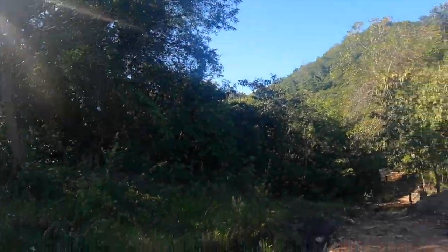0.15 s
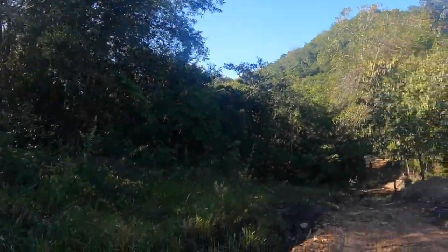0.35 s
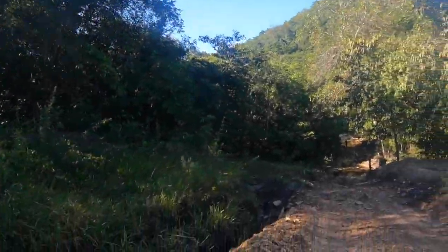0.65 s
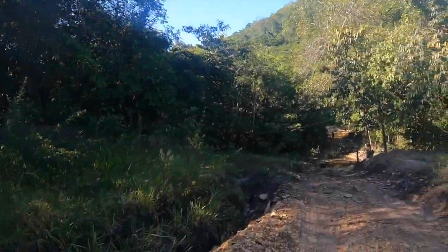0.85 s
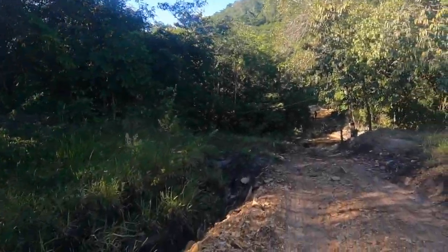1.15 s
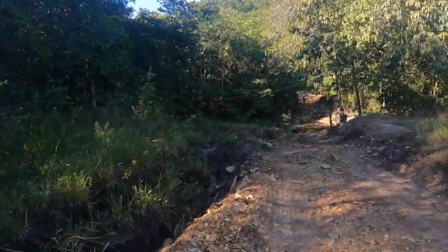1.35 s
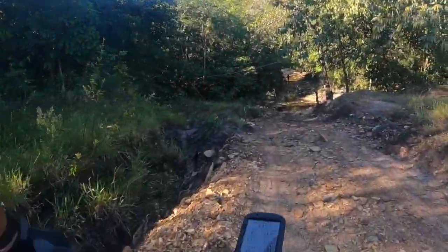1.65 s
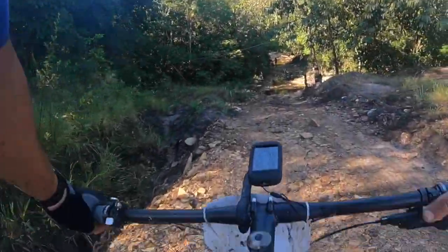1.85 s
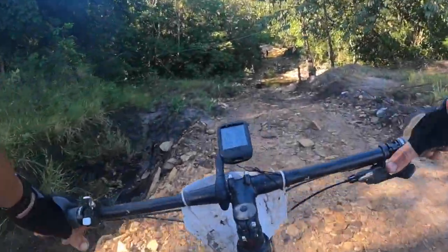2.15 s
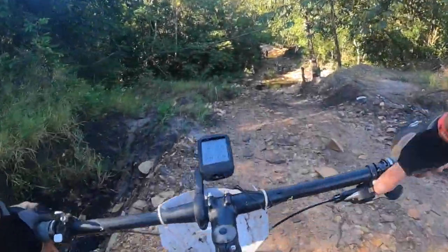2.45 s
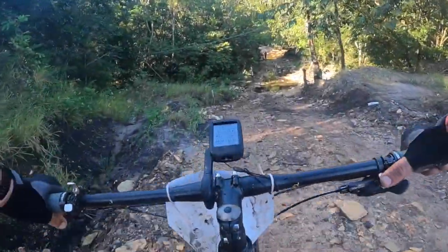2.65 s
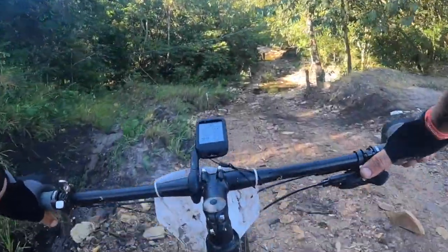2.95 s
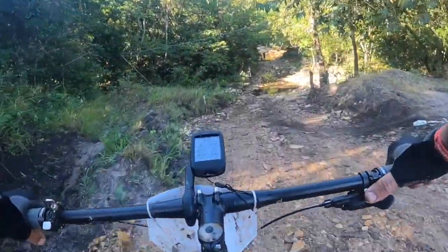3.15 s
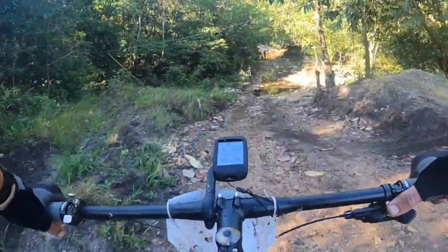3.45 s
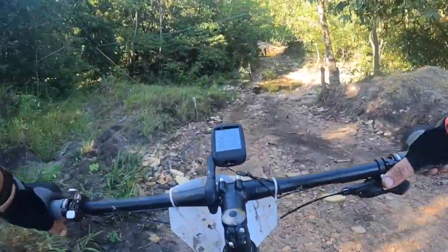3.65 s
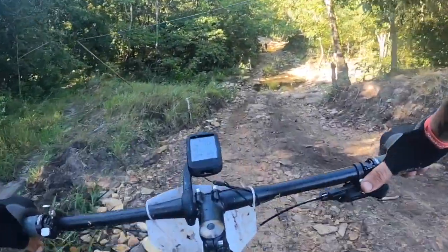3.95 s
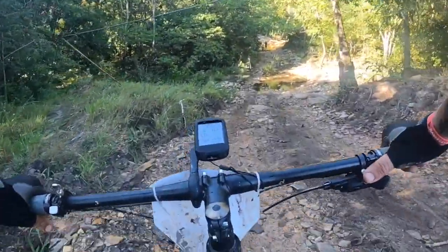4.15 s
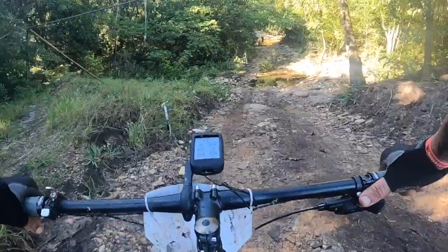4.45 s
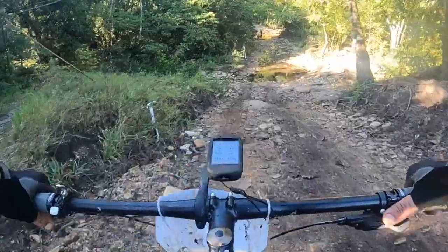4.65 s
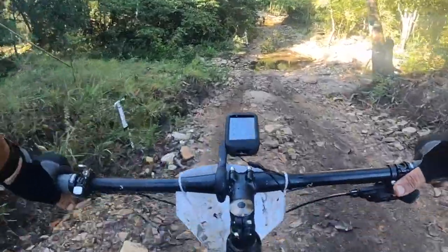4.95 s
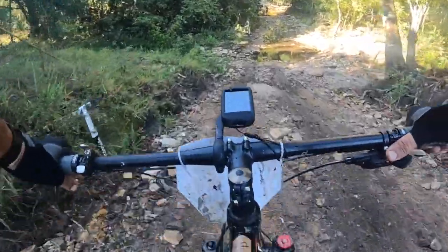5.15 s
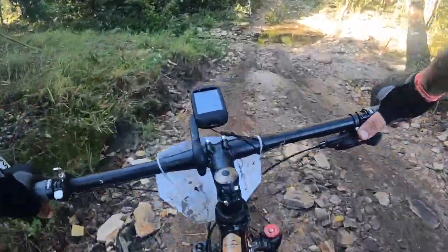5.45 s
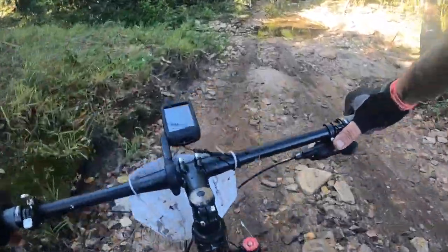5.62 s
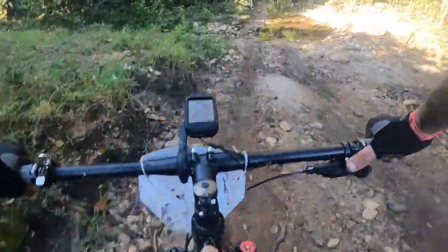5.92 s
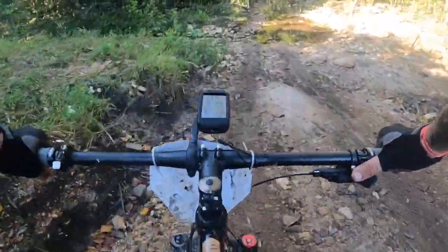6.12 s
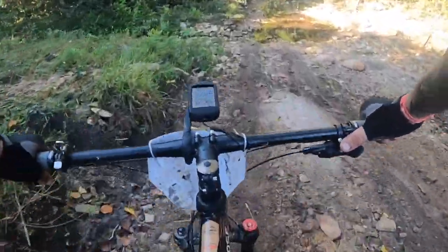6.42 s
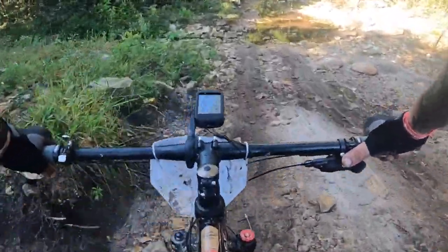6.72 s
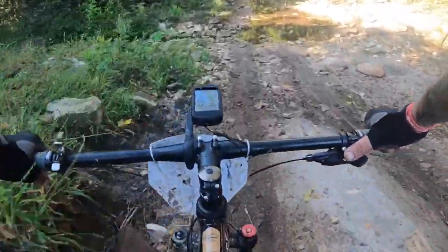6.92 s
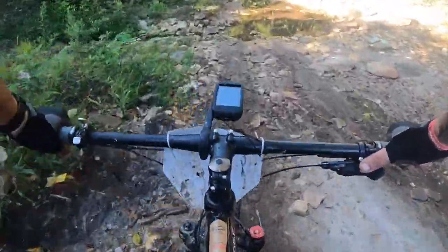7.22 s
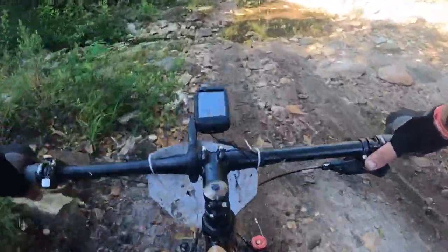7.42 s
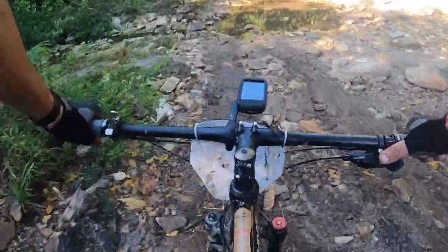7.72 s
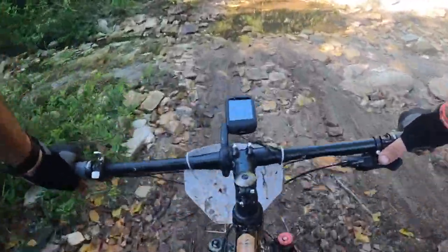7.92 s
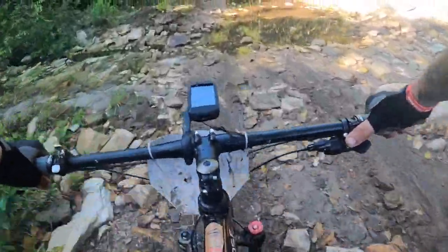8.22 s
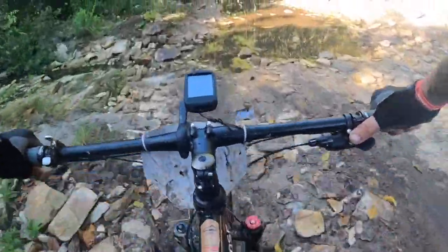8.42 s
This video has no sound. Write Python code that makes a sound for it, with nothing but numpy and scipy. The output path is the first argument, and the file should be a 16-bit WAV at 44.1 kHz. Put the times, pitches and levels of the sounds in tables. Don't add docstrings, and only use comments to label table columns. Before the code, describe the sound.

Close on a rider's chest, bike tyres crunch softly over loose grit, with pebble taps and thin bright hub clicks. After about three seconds a disc brake begins to squeal in short, unsteady grips, around a mid-high fixed pitch, growing loud and almost continuous. Stones thump tyre and frame beneath it, with low wind rumble, outdoors on a dry rocky trail.

```python
import sys
import numpy as np
from scipy import signal
from scipy.fft import rfft, irfft, next_fast_len
from scipy.io import wavfile
from scipy.ndimage import uniform_filter1d, minimum_filter1d, map_coordinates

SR = 44100
rng = np.random.default_rng(int(sys.argv[2]) if len(sys.argv) > 2 else 0)


def nominal_scale(level):
    x = np.asarray(level, float) / 20
    return 10 ** x


def wrap_up_sound(samples):
    columns = np.atleast_2d(samples).T
    tamed = np.clip(columns, -1, 1)
    steps = np.round(tamed * 32767).astype(np.int16)
    wavfile.write(sys.argv[1], SR, steps)


N = 378378

# [multiple of the fundamental, level/dB]
OVERTONES = [(1, 0), (2, -5), (3, -19), (4, -27), (5, -28), (6, -43), (7, -42), (8, -46), (9, -42),
             (10, -56.5), (11, -53.5), (12, -63), (13, -70.5), (14, -60), (15, -73.5)]
# [t/s, f/Hz]
ROTOR_PITCH = [(3.25, 866), (3.45, 874), (3.55, 856), (3.75, 862), (3.85, 872), (3.95, 860), (4.05, 872),
               (4.15, 890), (4.3, 868), (4.55, 858), (4.9, 858), (5.5, 862), (6.4, 856), (6.55, 861),
               (7.1, 860), (7.35, 854), (7.6, 860), (8.1, 856)]
STEADINESS = [2.8, 2.0, .8, .5]
FUNDAMENTAL_SLIPS = [3.328, 3.385, 3.459, 3.486, 4.167, 4.619, 4.68, 4.706, 4.825, 4.853, 4.928, 4.97,
                     5.085, 5.122, 5.275, 5.295, 5.36, 5.48, 5.517, 5.587, 5.741, 5.844, 5.874, 5.944,
                     6.228, 6.327, 6.43, 6.508, 6.596, 6.631, 6.678, 6.802, 6.846, 6.997, 7.123, 7.187,
                     7.228, 7.269, 7.318, 7.357, 7.464, 7.502, 7.659, 7.767, 7.851, 8.024, 8.081, 8.49]
OCTAVE_SLIPS = [3.924, 4.063, 4.945, 4.971, 5.16, 5.311, 5.346, 5.492, 5.542, 5.578, 5.625, 5.664, 5.689,
                5.723, 5.837, 5.859, 6.261, 6.439, 6.471, 6.519, 6.654, 6.736, 6.777, 6.828, 6.872, 6.925,
                6.95, 7.018, 7.042, 7.118, 7.161, 7.257, 7.333, 7.573, 7.617, 7.699, 7.764, 7.806, 7.849,
                8.033]
# [f/Hz, level/dB]
HISS_COLOUR = [(1760, -18), (3000, -12.5), (3860, 0), (4830, -3.5), (5440, -5), (8700, -8.5), (9660, -15.5),
               (10700, -23), (12300, -20.5), (14900, -37), (16000, -46)]


def brake():
    out = np.zeros((2, N))
    first_db, octave_db, third_db, upper_db = grips()
    lock = np.clip((np.maximum(first_db, octave_db) + 38) / 18, 0, 1)
    drag = nominal_scale((1 - lock) * 2 * wobble(35))
    wander = wobble(40)
    jitter_hz = 3 + 30 * (1 - lock) ** 2
    rest_hz = 862.5
    pitch = curves([(0, rest_hz)] + ROTOR_PITCH)[0] + 6 * wander + jitter_hz * wobble(220)
    phase = 2 * np.pi * np.cumsum(pitch) / SR
    for k, db in OVERTONES:
        group = min(k, 4) - 1
        level_db = [first_db, octave_db, third_db, upper_db + db + 19][group]
        steady = lock * STEADINESS[group]
        sign = slipping([FUNDAMENTAL_SLIPS, OCTAVE_SLIPS][k - 1]) if k < 3 else 1
        beat = beating(width_hz=44 * k ** .45, fastest_hz=110 * k ** .3)
        bend_hz = 6 * (k - 1) ** .5 * np.roll(wander, k * SR)
        stray = 2 * np.pi * np.cumsum(bend_hz) / SR
        locked = sign * steady * np.array([[1], [-.8]])
        loose = beat - np.array([[0], [.8]]) * beat[0]
        flutter = (locked + loose) / np.sqrt(1 + steady ** 2)
        tone = np.imag(flutter * np.exp(1j * (k * phase + stray)))
        out += np.sqrt(2) * nominal_scale(level_db) * drag * tone
    rasp = nominal_scale(upper_db - 25) * grainy(HISS_COLOUR, grain_db=3.0, grain_rate=720, lump_db=3.0)
    return out + rasp


# [top t/s, half length/s, level/dB]
LIGHT_TOUCHES = [
    (0.07, 0.071, -43),
    (.2, 0.16, -51),
    (0.385, 0.083, -40),
    (.46, .04, -46),
]
# [top t/s, half length/s, level/dB]
GRIPS = [(3.27, 0.13, -35), (3.408, 0.0743, -22), (3.506, 0.067, -22.5), (3.677, 0.148, -35),
         (3.816, 0.0744, -29), (3.913, 0.034, -26), (4.032, 0.12, -26.5), (4.156, 0.096, -34),
         (4.28, 0.1, -33), (4.4, 0.0779, -36), (4.51, 0.1032, -33.5), (4.616, 0.1, -26),
         (4.678, 0.046, -32.5), (4.759, 0.0747, -21.5), (4.892, 0.1, -18.5), (5, 0.06, -17),
         (5.094, 0.1, -31.5), (5.193, 0.12, -23), (5.302, 0.066, -21), (5.385, 0.051, -35),
         (5.434, 0.088, -16.5), (5.488, 0.061, -31), (5.556, 0.068, -19), (5.618, 0.018, -30),
         (5.667, 0.094, -16.5), (5.751, 0.097, -28), (5.849, 0.075, -18.5), (5.929, 0.075, -29.5),
         (6.045, 0.1, -31), (6.176, 0.0754, -31), (6.255, 0.0795, -16), (6.346, 0.059, -27.5),
         (6.429, 0.089, -21.5), (6.473, 0.077, -30), (6.553, 0.069, -17.5), (6.66, 0.12, -20.5),
         (6.746, 0.08, -16.5), (6.839, 0.082, -17), (6.943, 0.084, -18.5), (7.027, 0.088, -25.5),
         (7.13, 0.087, -20.5), (7.199, 0.06, -27.5), (7.268, 0.067, -16.5), (7.373, 0.11, -28),
         (7.473, 0.094, -25), (7.518, 0.04, -28.5), (7.583, 0.066, -22), (7.633, 0.067, -26.5),
         (7.709, 0.073, -19), (7.81, 0.076, -17.5), (7.882, 0.082, -31), (7.938, 0.089, -19),
         (8.014, 0.13, -31.5), (8.14, 0.1, -34), (8.296, 0.13, -28), (8.418, 0.053, -32.5),
         (8.481, 0.075, -26.5), (8.539, 0.07, -31)]
# [top t/s, half length/s, level/dB]
OCTAVE_SWELLS = [(3.193, 0.078, -42.5), (3.312, 0.1, -35), (3.442, 0.11, -35), (3.562, 0.0503, -22.5),
                 (3.637, 0.046, -32), (3.722, 0.064, -32), (3.826, 0.075, -37), (3.881, 0.09, -34.5),
                 (3.951, 0.065, -33), (4.041, 0.069, -28), (4.136, 0.072, -32.5), (4.235, 0.058, -34),
                 (4.62, 0.19, -37.5), (4.769, 0.091, -34.5), (4.889, 0.086, -39.5), (4.959, 0.073, -19),
                 (5.044, 0.091, -36), (5.158, 0.079, -27.0), (5.293, 0.065, -27.5), (5.398, 0.2, -35.5),
                 (5.468, 0.057, -27), (5.527, 0.018, -15.5), (5.592, 0.067, -18), (5.677, 0.067, -24.5),
                 (5.767, 0.089, -20.5), (5.872, 0.072, -27.5), (5.941, 0.062, -38), (6.186, 0.05, -35.5),
                 (6.266, 0.069, -17.5), (6.366, 0.047, -30), (6.44, 0.065, -18.5), (6.52, 0.072, -28.5),
                 (6.595, 0.066, -21.5), (6.66, 0.032, -32), (6.72, 0.089, -23.5), (6.795, 0.04, -27.5),
                 (6.864, 0.072, -19), (6.964, 0.086, -23), (7.069, 0.078, -21.5), (7.129, 0.036, -32),
                 (7.179, 0.056, -20.5), (7.214, 0.015, -27), (7.29, 0.092, -23.5), (7.43, 0.089, -36),
                 (7.538, 0.072, -25), (7.603, 0.051, -32.5), (7.658, 0.079, -20.5), (7.722, 0.058, -31.5),
                 (7.777, 0.091, -22.5), (7.852, 0.097, -24.5), (7.967, 0.057, -20.5), (8.072, 0.078, -30.5),
                 (8.246, 0.077, -33.5), (8.361, 0.11, -43.5), (8.466, 0.063, -38), (8.551, 0.04, -36.5)]
# [top t/s, half length/s, level/dB]
TWELFTH_SWELLS = [(3.293, 0.15, -52), (3.572, 0.11, -51), (3.732, 0.087, -46), (3.871, 0.0505, -59),
                  (4.006, 0.038, -39.5), (4.096, 0.091, -44), (4.235, 0.068, -45.5), (4.55, 0.36, -52),
                  (4.944, 0.079, -36.5), (5.029, 0.15, -49.5), (5.168, 0.062, -51.5), (5.283, 0.15, -42.5),
                  (5.448, 0.063, -35), (5.572, 0.1, -31), (5.692, 0.093, -32.5), (5.802, 0.073, -34.5),
                  (5.892, 0.06, -46.5), (6.236, 0.062, -33.5), (6.301, 0.13, -49.5), (6.41, 0.052, -39.5),
                  (6.52, 0.11, -36.5), (6.635, 0.073, -34), (6.705, 0.049, -40), (6.765, 0.052, -37),
                  (6.854, 0.077, -31.5), (6.954, 0.061, -31.5), (7.064, 0.075, -40.5),
                  (7.169, 0.064, -32.5), (7.288, 0.092, -42.5), (7.448, 0.049, -45.5),
                  (7.543, 0.081, -34.5), (7.633, 0.067, -29.5), (7.722, 0.098, -36.5),
                  (7.822, 0.093, -37.5), (7.937, 0.11, -37.5), (8.171, 0.49, -52)]


def grips():
    third_db = swells(TWELFTH_SWELLS)
    upper_db = -33.5 + (third_db + 33.5) - 0.15 * bumps()
    return swells(LIGHT_TOUCHES + GRIPS), swells(OCTAVE_SWELLS), third_db, upper_db


def slipping(times):
    t = np.arange(0, N + 32, 32) / SR
    sign = np.prod(np.tanh((t - np.array(times)[:, None]) / .007), axis=0)
    return np.interp(np.arange(N) / SR, t, sign)


def beating(width_hz, fastest_hz):
    noise = rng.standard_normal((2, N)) + 1j * rng.standard_normal((2, N))
    for hz in (width_hz / 2, fastest_hz, fastest_hz):
        noise = signal.lfilter([1], [1, -np.exp(-2 * np.pi * hz / SR)], noise)
    return unit(noise)


# [top t/s, half length/s, level/dB]
NEIGHBOUR_SWELLS = [
    (3.45, 0.11, -36),
    (4.15, 0.12, -33),
    (4.38, 0.064, -34),
    (5.36, 0.064, -46),
    (5.6, 0.15, -41),
]


def neighbour():
    mode_hz = 950
    tone = np.exp(2j * np.pi * mode_hz * np.arange(N) / SR)
    band = np.imag(beating(width_hz=50, fastest_hz=110) * tone)
    return np.sqrt(2) * nominal_scale(swells(NEIGHBOUR_SWELLS)) * band


# [t/s, carcass load level/dB, loose litter level/dB]
GROUND = [(0, -39.5, -51), (.25, -47.5, -55), (.7, -46, -51.5), (1.0, -46, -48), (1.3, -40.5, -47),
          (1.6, -37.5, -45.5), (2.0, -38, -44), (2.4, -36, -41), (3.0, -36, -41.5), (3.8, -36.5, -44),
          (4.3, -35, -45), (4.65, -35, -48.5), (5.0, -39, -52), (5.7, -41.5, -55), (6.3, -41, -52),
          (6.8, -42.5, -52.5), (7.8, -40.5, -57), (8.58, -37.5, -46.5)]
# [f/Hz, level/dB]
CARCASS_COLOUR = [(47, -38), (80, -19), (119, -5), (173, 1), (264, 2.5), (449, -1), (641, -7.5),
                  (800, -4.5), (1040, -8.5), (1760, -120)]
# [f/Hz, level/dB]
GRIT_COLOUR = [(350, -11), (600, -4.5), (899, -2.5), (1070, 0), (1580, 1), (2390, -4), (3930, -9.5),
               (4500, -16), (5850, -28), (9900, -120)]


def rolling():
    load_db, litter_db = curves(GROUND)
    bump_db = bumps()
    thud = nominal_scale(load_db + bump_db - .4) * grainy(CARCASS_COLOUR, grain_db=2.4, grain_rate=110, lump_db=1.2)
    belly = filtered(thud, lambda hz: 1 / (1 + (hz / 269) ** 6))
    unloaded_db = 0.81 * np.minimum(load_db + bump_db + 36.5, 0)
    thud = thud + (nominal_scale(unloaded_db) - 1) * belly
    grit_db = litter_db + 0.96 * bump_db + 4
    grit = nominal_scale(grit_db) * grainy(GRIT_COLOUR, grain_db=2.5, grain_rate=450, lump_db=1.3)
    hiss_db = -58.5 + 1.36 * (litter_db + 41.5) + 0.69 * bump_db + 12
    hiss = nominal_scale(hiss_db) * grainy(HISS_COLOUR, grain_db=0.5, grain_rate=3200, lump_db=1.6)
    return thud + grit + hiss


# [top t/s, climb/s, drop/s, swell level/dB]
BUMPS = [(.39, 0.34, 0.27, 3.5), (.95, 0.83, 0.22, 5), (1.21, 0.01, 0.03, 3), (1.5, 0.47, 0.11, 3),
         (2.02, 0.14, 0.038, 4.5), (2.969, 0.024, 0.013, 6.5), (3.32, 0.026, 0.14, 5.5),
         (3.87, 0.099, 0.0088, 5.5), (4.03, 0.16, 0.57, 3.5), (4.35, 0.035, 0.35, 5),
         (4.82, 0.2, 0.19, 13.5), (5.241, 0.29, 0.4, 14), (5.588, 0.022, 0.13, 7),
         (5.779, 0.025, 0.46, 17.5), (6.13, 0.02, 0.09, 13), (6.211, 0.016, 0.06, 19),
         (6.621, 0.15, 0.1, 5.5), (7.018, 0.039, 0.021, 12.5), (7.09, 0.058, 0.039, 6.5),
         (7.099, 0.15, 0.3, 4), (6.87, 0.046, 0.097, 2.5), (7.57, 0.036, 0.2, 14), (7.45, 0.22, 0.1, 6.5),
         (8.04, 0.069, 0.16, 12.5), (8.14, 0.11, 0.077, 7), (8.29, 0.11, 0.1, 7.5), (8.48, 0.036, 0.26, 2)]


def bumps():
    t = np.arange(N) / SR
    return sum(np.interp(t, [s - climb, s, s + drop], [0, db, 0]) for s, climb, drop, db in BUMPS)


# [t/s, peak level/dB, low ring f/Hz, clack level/dB]
KNOCKS = [(1.244, -17.5, 420, -25), (1.548, -13.5, 350, -22), (1.8448, -19, 129, -6),
          (1.846, -22, 285, -27), (3.829, -15, 253, -23), (3.317, -23, 208, -18), (3.513, -18.5, 530, -29),
          (3.864, -12.5, 285, -27), (4.019, -19, 196, -21.5), (4.334, -26.5, 268, -1),
          (4.39, -19, 323, -26), (4.801, -18.5, 157, -5.5), (4.828, -4, 350, -34), (5.072, -18, 171, -10.5),
          (5.194, -19, 179.8, -14), (5.241, -13, 128, -27), (5.26, -16, 275, -35), (5.396, -24, 121, -22),
          (5.762, -20, 324, -13), (5.827, -14.5, 344, -5), (5.964, -21.5, 294, -14.5),
          (6.111, -23, 111, -10.5), (6.2, -21.5, 159, -1), (7.008, -31, 255, -2.5), (7.563, -22, 282, -20),
          (8.043, -27, 344, -0.5), (8.086, -19.5, 274, -12), (8.126, -19.5, 254, -31.5),
          (8.269, -25, 302, -22), (8.466, -16.5, 142, -22)]
# [t/s, peak level/dB, ring f/Hz]
PEBBLES = [(0.899, -9.5, 1360), (0.938, -19, 2000), (1.098, -17.5, 800), (1.317, -19.5, 1270),
           (1.354, -19, 1120), (1.519, -17.5, 1260), (1.8502, -11, 1050), (1.8537, -10, 1050),
           (1.859, -9, 1000), (1.928, -23, 1750), (1.959, -15.5, 1900), (2.207, -17, 1700),
           (2.428, -21.5, 1250), (2.708, -18.5, 890), (2.867, -12.5, 1490), (2.963, -14.5, 1420),
           (3.174, -13.5, 2400), (3.224, -19, 1500), (3.724, -12.5, 2020), (5.352, -26, 1150),
           (4.025, -26, 713), (8.05, -17, 900), (8.084, -24.5, 1070), (8.13, -28, 710),
           (1.247, -15.5, 1140), (4.836, 2.5, 895), (5.96, -25, 1210), (8.278, -12, 866), (5.782, -9, 1040),
           (5.834, -9.5, 1020), (0.981, -19.5, 1100), (1.202, -25, 1110), (1.419, -22, 493),
           (2.748, -15.5, 794), (4.687, -12, 950), (4.818, -14, 603), (5.197, -15.5, 2440),
           (5.768, -13, 700), (5.981, -30, 1514), (6.112, -18.5, 2350), (6.201, -19.5, 2240),
           (6.217, -16, 1290), (7.027, -11.5, 1500), (7.09, -14.5, 1100), (7.578, -15, 615),
           (8.466, -23, 2480)]


def knocks():
    out = np.zeros(N)
    for s, db, hz, clack_db in KNOCKS:
        low = ring(hz, 11 / hz, rise=0.0011) + 0.24 * ring(1.55 * hz, 9 / hz, rise=0.00054)
        clack = sum(ring(f, .045) for f in rng.uniform(550, 1900, size=4))
        add(out, s + .004, nominal_scale(db + 4) * (nominal_scale(clack_db - 8) * clack - low))
    for s, db, hz in PEBBLES:
        rise = .25 / hz
        tap = ring(hz, 12 / hz, rise)
        tap = tap - 0.35 * ring(1.75 * hz, 10 / hz, rise) - 0.35 * ring(0.6 * hz, 11 / hz, rise)
        add(out, s + 0.00085, nominal_scale(db - 2.36) * tap)
    return out * np.array([[1], [-.3]])


# [t/s, peak level/dB, ring f/Hz]
PAWLS = [(0.521, -36, 12300), (0.619, -34, 12300), (.647, -46, 12400), (0.883, -43.5, 11900),
         (.9124, -44, 11800), (0.994, -31.5, 12200), (1.225, -36, 12100), (1.403, -34, 7900),
         (2.0276, -30.5, 7700), (2.2636, -30.5, 7650), (2.281, -29, 8300), (2.288, -22.5, 6550),
         (2.3027, -26.5, 8100), (2.31, -28, 8600), (2.333, -22.5, 8770), (2.377, -23, 8200),
         (2.422, -22, 8700), (2.709, -16, 7760), (2.9248, -21, 8850), (2.991, -24.5, 8900),
         (3.015, -23, 8800), (3.867, -31.5, 7040)]
# [t/s, peak level/dB, ring f/Hz]
CABLES = [(0.6325, -37.5, 5720), (0.901, -43, 11800), (0.937, -29.5, 8140), (0.9545, -29, 7100),
          (0.976, -32.5, 12200), (2.1665, -35.5, 6740), (2.294, -30, 8300), (2.297, -26, 6260),
          (3.0284, -24.5, 6100), (3.721, -29.5, 6400), (3.8362, -15.5, 6100), (3.839, -13, 6600),
          (4.139, -19.5, 5750), (4.2963, -23.5, 6060), (4.4117, -23.5, 6130)]
# [t/s, peak level/dB, ring f/Hz]
HOUSINGS = [(1.235, -39, 7350), (1.5337, -35, 5640), (1.856, -35, 5800), (2.2503, -40.5, 5780),
            (3.1616, -36.5, 6650), (4.685, -39, 5680), (4.8354, -33.5, 5760), (5.262, -37, 5750),
            (5.864, -34, 6550)]
# [f/Hz, level/dB]
STEEL_COLOUR = [(3500, -30), (5000, -2), (6100, 0), (7100, -2), (8400, 0.5), (10000, -6.5), (12200, -19.5),
                (14000, -25.5), (16000, -23)]
# [f/Hz, level/dB]
CLAMP_COLOUR = [(1200, -28), (2800, 8), (4000, 10.5), (5400, 1.5), (7000, -36.5)]


def ticks():
    bright, body, tone = np.zeros((3, 2, N))
    t = np.arange(1200) / SR
    for rows, clamp_db in [(PAWLS, -19.5), (CABLES, -7), (HOUSINGS, 6)]:
        for s, db, hz in rows:
            decay = nominal_scale(db + 4 - 60 * t / .005) + nominal_scale(db - 14 - 60 * t / .04)
            crack = decay * np.sign(rng.standard_normal((2, len(t)))) * np.array([[1], [3]])
            add(bright, s, crack)
            add(body, s, nominal_scale(clamp_db) * crack)
            place = np.array([[1], [rng.normal(0, 2)]])
            add(tone, s, nominal_scale(db - 9) * ring(hz, 0.012) * place)
    steel = filtered(bright, lambda hz: nominal_scale(along(STEEL_COLOUR, hz)))
    clamp = filtered(body, lambda hz: nominal_scale(along(CLAMP_COLOUR, hz)))
    return tone + steel + clamp


# [t/s, level/dB]
WIND_LEVEL = [(0.0, -21), (0.035, -56.5), (1.8, -47), (2.3, -43), (3.7, -44), (3.82, -35.5), (4.7, -43.5),
              (4.8, -36.5), (6.14, -39.5), (6.66, -48), (7.67, -43), (8.27, -47.5), (8.48, -38),
              (8.58, -44)]
# [f/Hz, level/dB per Hz]
BUFFET_COLOUR = [(12, -29.5), (20, 1), (48, -5.5), (81, -10), (130, -13), (170, -23.5), (290, -120)]


def wind():
    level = nominal_scale(curves(WIND_LEVEL)[0] + 5.5)
    return level * grainy(BUFFET_COLOUR, grain_db=-1.5, grain_rate=10, lump_db=3.5)


def unit(x):
    return x / np.sqrt(np.mean(np.abs(x) ** 2) + 1e-20)


def along(points, hz):
    f, v = np.transpose(points)
    return np.interp(np.log(hz + 1), np.log(f + 1), v)


def curves(rows):
    s, *cols = np.transpose(rows)
    return [np.interp(np.arange(N) / SR, s, c) for c in cols]


def swells(rows):
    overlap = .7
    t, level = np.arange(0, N + 64, 64) / SR, 1e-3
    for s, half, db in rows:
        shape = np.cos(np.pi / 2 * np.clip((t - s) / half, -1, 1)) ** 2
        level = level + (nominal_scale(db) * shape) ** overlap
    return np.interp(np.arange(N) / SR, t, 20 / overlap * np.log10(level))


def wobble(rate):
    knots = rng.standard_normal(int(N * 2000 / SR) + 4)
    return map_coordinates(knots, [np.arange(N) * min(rate, 2000) / SR])


def filtered(x, response):
    m = next_fast_len(N + SR // 4)
    return irfft(rfft(x, m) * response(np.fft.rfftfreq(m, 1 / SR)), m)[..., :N]


def grainy(spectrum, grain_db, grain_rate, lump_db):
    chop = nominal_scale(grain_db * wobble(grain_rate) + lump_db * wobble(22))
    return unit(filtered(chop * rng.standard_normal((2, N)), lambda hz: nominal_scale(along(spectrum, hz))))


def add(track, s, sound):
    part = track[..., round(s * SR):][..., :sound.shape[-1]]
    part += sound[..., :part.shape[-1]]


def ring(hz, t60, rise=0.0001):
    t = np.arange(SR // 8) / SR
    return np.sin(2 * np.pi * hz * t) * nominal_scale(-60 * t / t60) * (1 - np.exp(-t / rise))


def scene():
    mid, side = brake() + neighbour() + rolling() + knocks() + ticks() + wind()
    return np.array([mid + side, mid - side])


def low_pass(x):
    return signal.sosfilt(signal.butter(12, 16510, fs=SR, output="sos"), x)


# [t/s, side over mid level/dB]
STEREO_WIDTH = [(0, -66), (.9, -27.5), (2.5, -15), (3.6, -13), (4.0, -8), (4.35, -26), (4.8, -56.5),
                (8.6, -75.5)]
# [f/Hz, level/dB]
SIDE_COLOUR = [(25, 0), (90, 12), (180, 8), (300, 1), (450, 0), (860, 8), (1300, 1), (3000, 1), (4500, -8),
               (7500, -10), (10000, -15)]


def record(dry):
    split_hz, top_hz = 11200, 15900
    mid, side = (dry[0] + dry[1]) / 2, (dry[0] - dry[1]) / 2
    narrowed = nominal_scale(curves(STEREO_WIDTH)[0]) * side
    low = filtered(narrowed, lambda hz: nominal_scale(along(SIDE_COLOUR, hz)) * (hz < split_hz))
    top = filtered(nominal_scale(-9) * side + .2 * mid, lambda hz: hz >= split_hz)
    pair = np.array([mid + low + top, mid - low - top])
    need = np.minimum(1, 0.54 / (np.abs(pair).max(axis=0) + 1e-9))
    gain = uniform_filter1d(minimum_filter1d(need, size=401), size=301)
    return low_pass(filtered(pair * gain, lambda hz: hz < top_hz))


dry = scene()
out = record(dry)
wrap_up_sound(out)
```